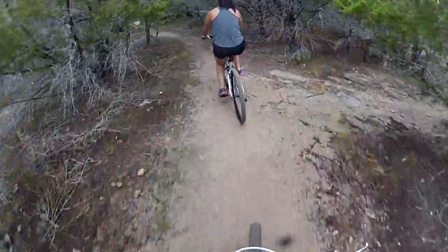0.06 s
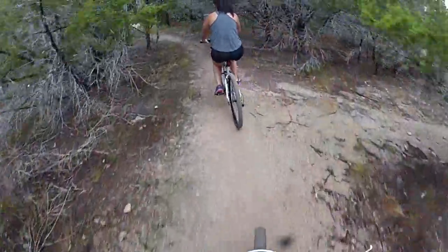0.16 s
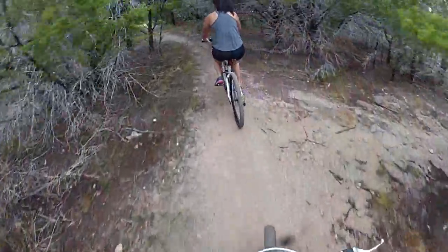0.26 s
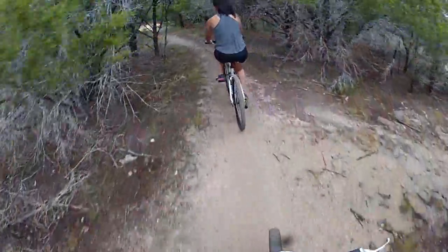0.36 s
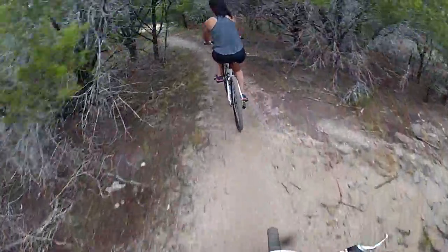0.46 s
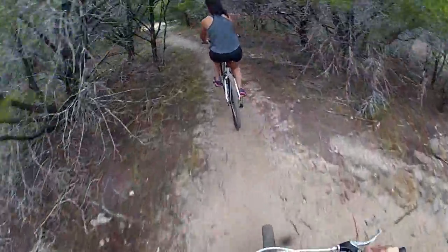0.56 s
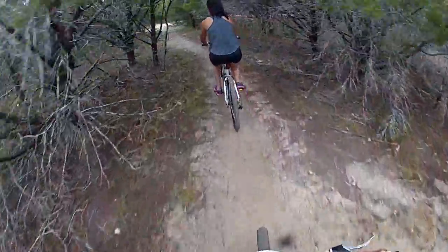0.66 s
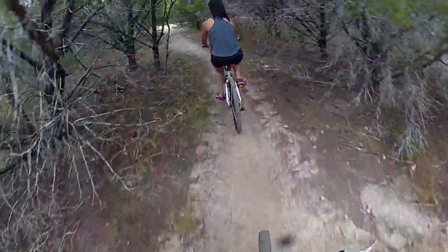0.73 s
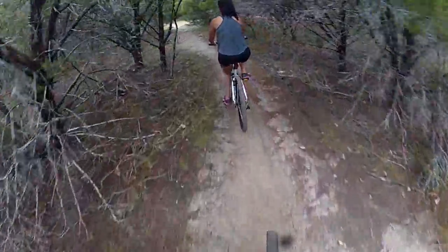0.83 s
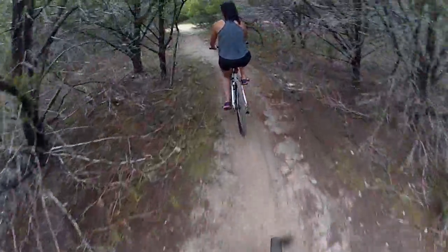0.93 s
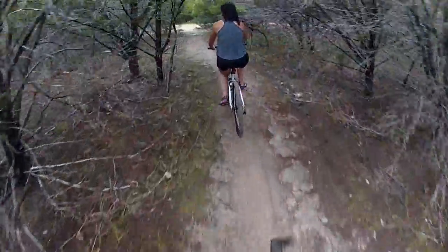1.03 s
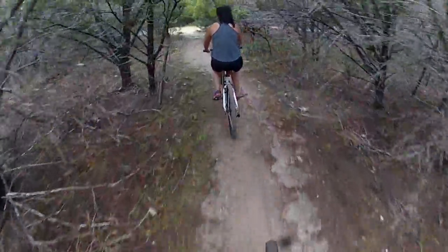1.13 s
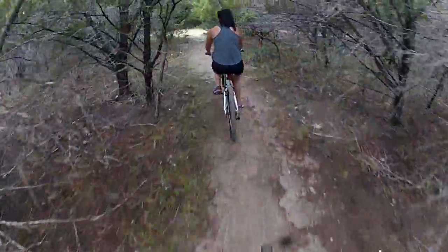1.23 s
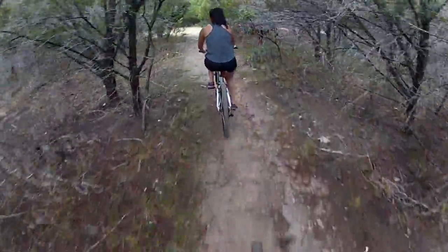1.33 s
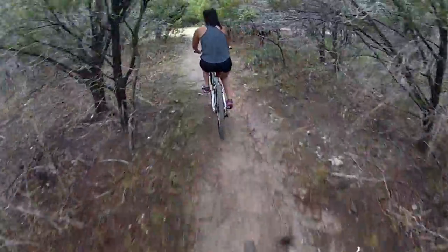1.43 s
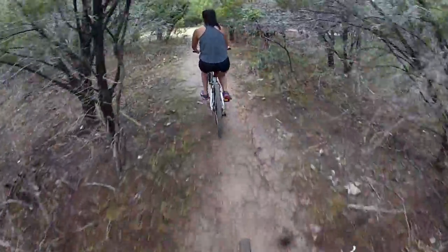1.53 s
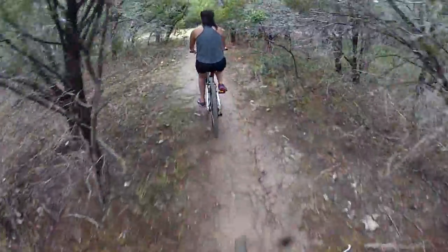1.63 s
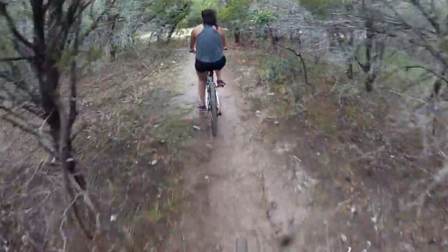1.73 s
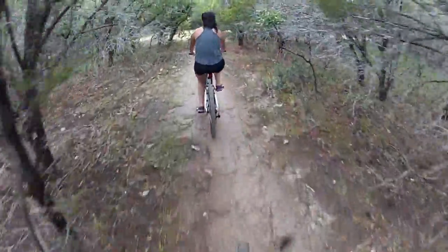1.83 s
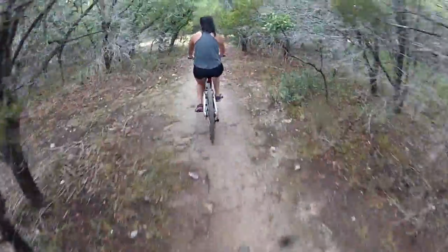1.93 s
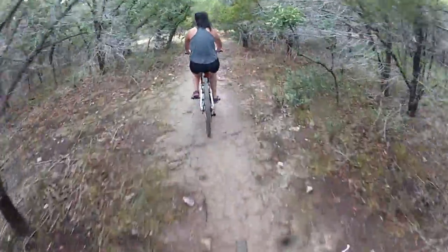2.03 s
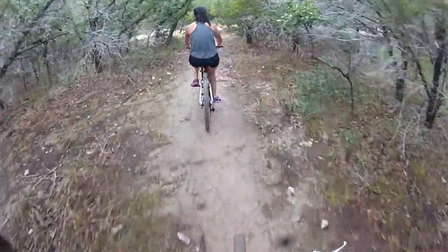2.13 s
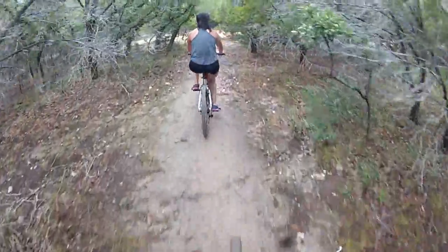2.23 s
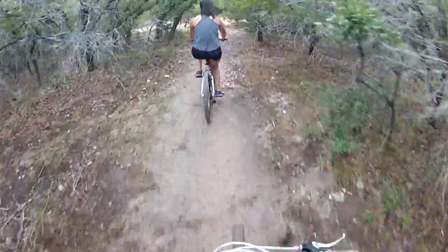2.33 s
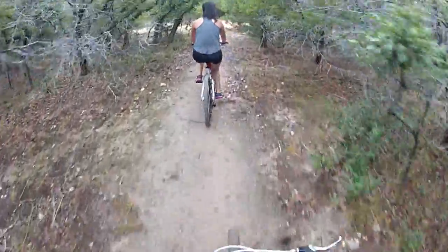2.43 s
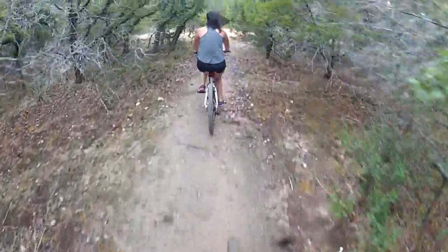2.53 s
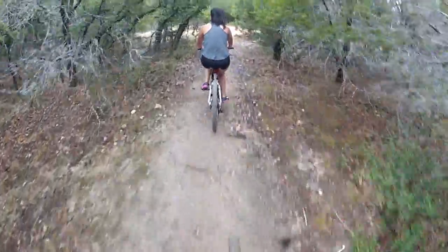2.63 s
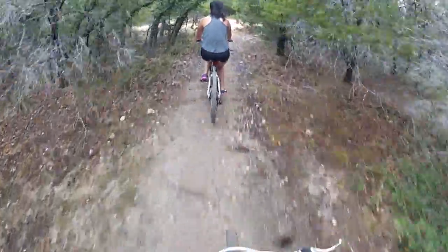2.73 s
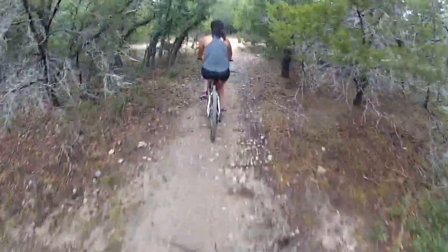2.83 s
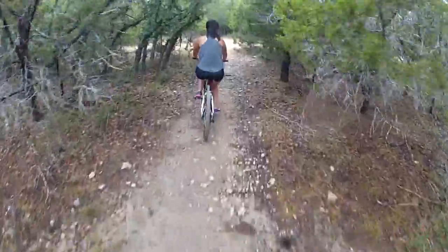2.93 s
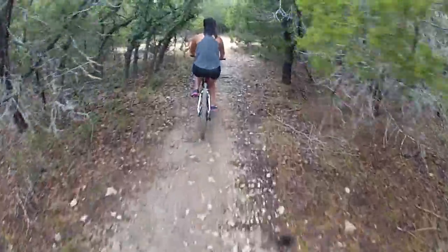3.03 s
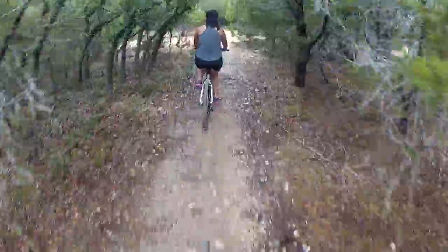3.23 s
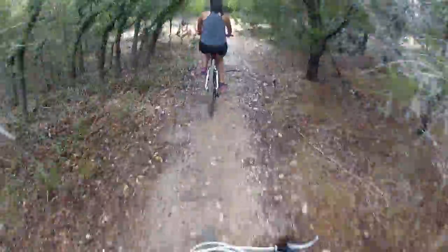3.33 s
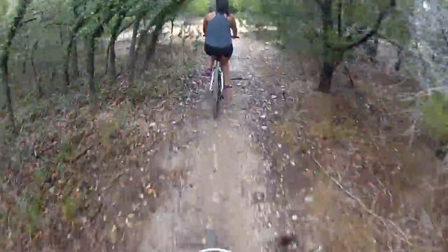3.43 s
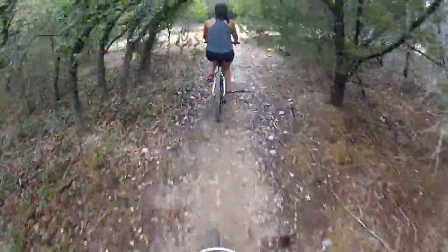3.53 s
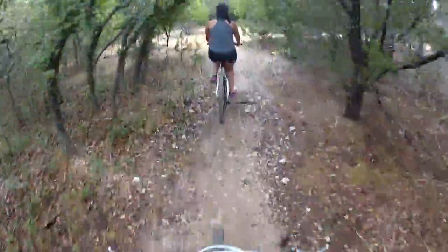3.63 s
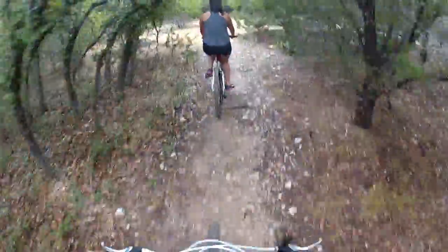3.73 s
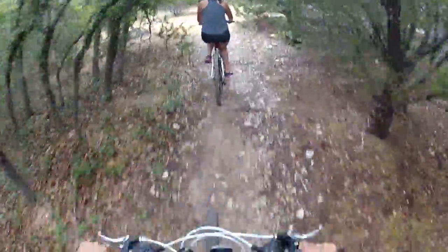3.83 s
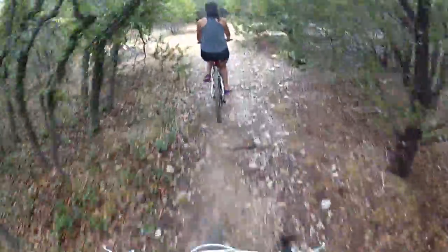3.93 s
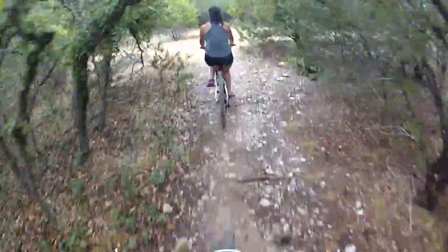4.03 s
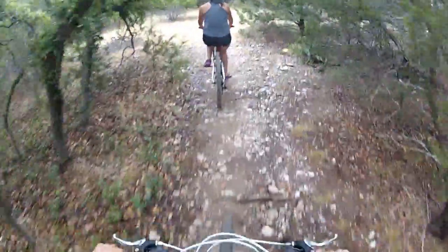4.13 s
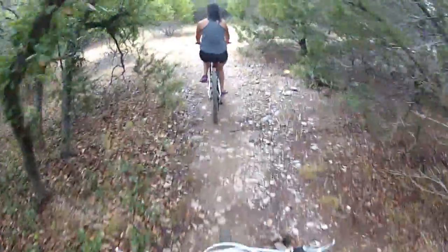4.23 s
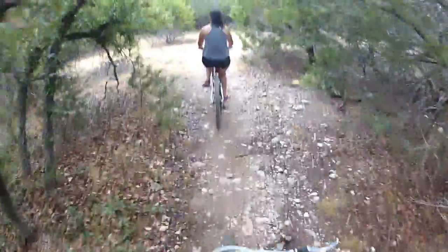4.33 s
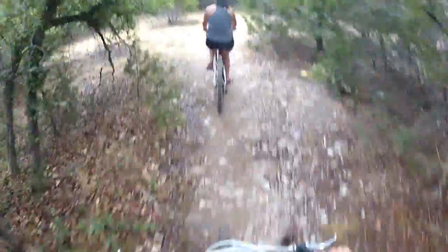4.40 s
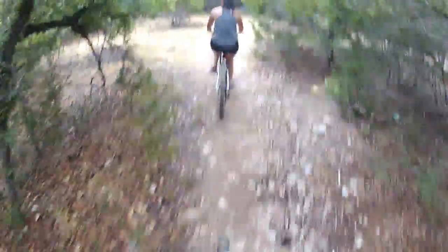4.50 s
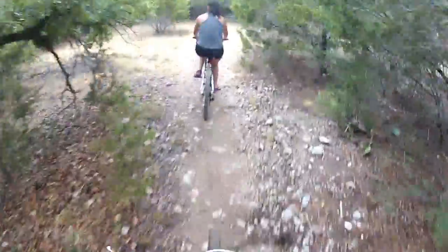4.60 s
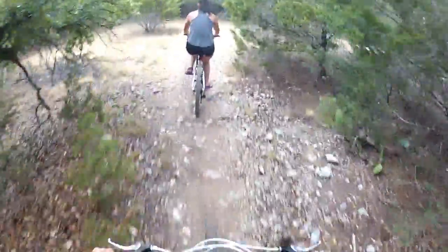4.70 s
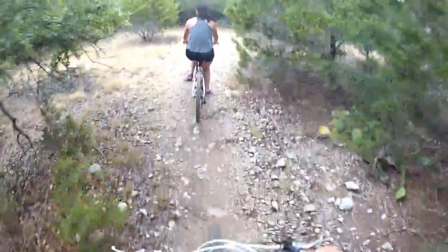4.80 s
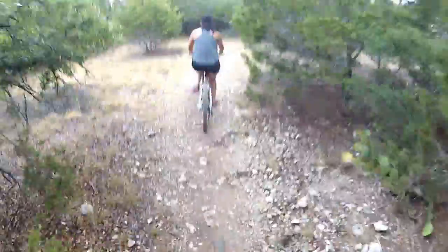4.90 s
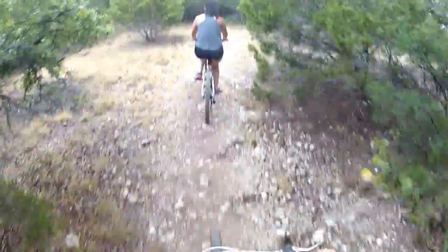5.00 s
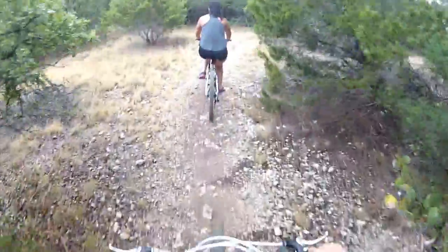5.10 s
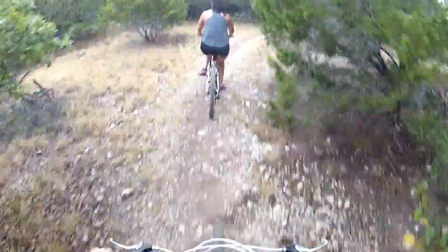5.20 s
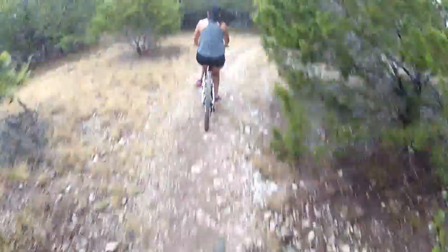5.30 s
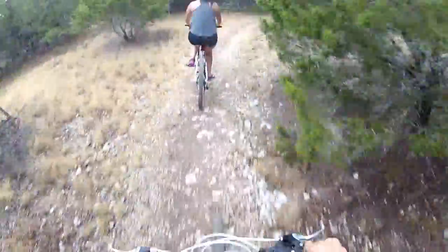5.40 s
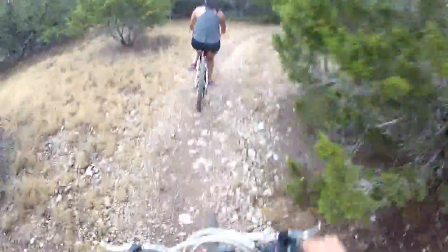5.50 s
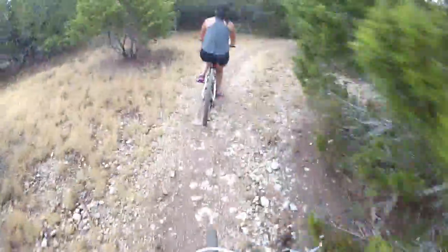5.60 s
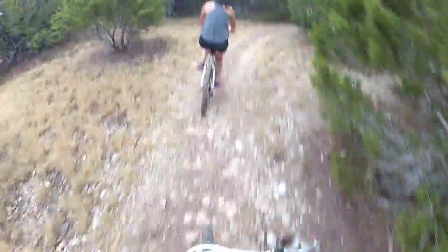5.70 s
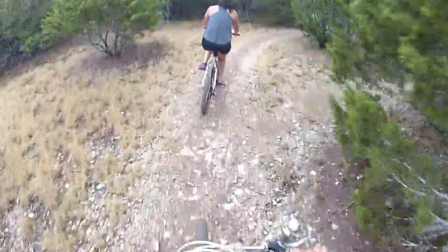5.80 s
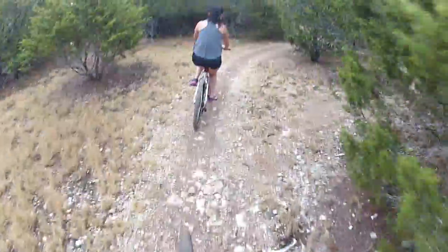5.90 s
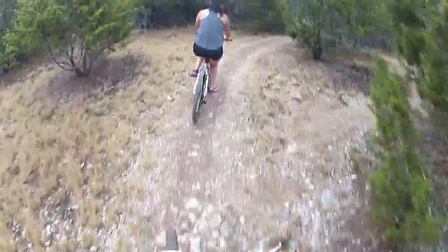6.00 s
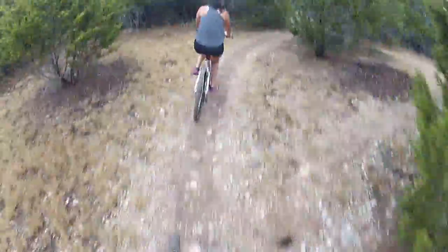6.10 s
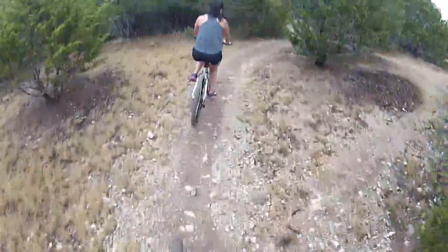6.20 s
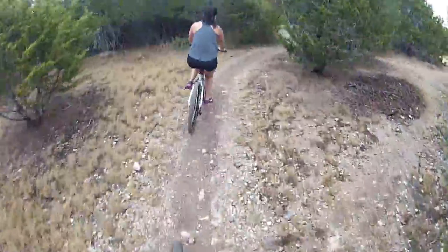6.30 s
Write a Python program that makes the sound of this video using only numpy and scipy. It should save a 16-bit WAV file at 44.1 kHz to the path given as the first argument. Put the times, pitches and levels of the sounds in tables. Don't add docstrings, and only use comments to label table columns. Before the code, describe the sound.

A bike-mounted microphone inside a closed case picks up dull low rumble, soft rocking and faint electronic hiss and buzz on smooth dirt. A few rattles start after two seconds, then hard clacks and hollow shakes come in irregular clusters as the trail turns rocky. Low jolts push the microphone, and short thin squeaks slip between knocks. The sound is close, dry, lo-fi and gritty on top.

```python
import sys
import numpy as np
from scipy import signal
from scipy.fft import rfft, irfft
from scipy.io import wavfile
from scipy.ndimage import uniform_filter1d

SR = 44100
rng = np.random.default_rng(int(sys.argv[2]) if len(sys.argv) > 2 else 0)


def ratio(d):
    e = np.asarray(d, float) / 20
    return 10 ** e


def generate_wav(signal):
    frames = np.transpose(np.atleast_2d(signal))
    scaled = np.clip(frames, -1, 1) * 32767
    pcm = np.round(scaled).astype(np.int16)
    wavfile.write(sys.argv[1], SR, pcm)


N = 280035


def rms_one(x):
    return x / np.sqrt(np.mean(x ** 2) + 1e-20)


def filtered(x, order, hz, kind="low"):
    return signal.sosfilt(signal.butter(order, hz, kind, fs=SR, output="sos"), x)


def around(s, reach_s):
    span = slice(max(int((s - reach_s) * SR), 0), min(int((s + reach_s) * SR), N))
    return span, np.arange(span.start, span.stop) / SR - s


def drift(per_s):
    r = np.exp(-2 * np.pi * per_s / SR)
    noise = rng.standard_normal(N + SR)
    return rms_one(signal.lfilter([1], [1, -2 * r, r * r], noise)[SR:])


def coloured(spectrum):
    hz, db = np.transpose(spectrum)
    bins_hz = np.arange(N // 2 + 1) * SR / N + 1
    gain = ratio(np.interp(np.log(bins_hz), np.log(hz), db, left=-80, right=-80))
    return rms_one(irfft(rfft(rng.standard_normal(N)) * gain, N))


def resonate(x, modes):
    out = 0
    for k, (hz, width_hz, db) in enumerate(modes):
        r = np.exp(-np.pi * width_hz / SR)
        poles = [1, -2 * r * np.cos(2 * np.pi * hz / SR), r * r]
        ringing = signal.lfilter([1 - r * r, 0, r * r - 1], poles, x + 1e-18)
        out = out + (-1) ** k * ratio(db) * ringing
    return out


def contacts(per_s, spread_db):
    sizes = ratio(spread_db * np.minimum(rng.exponential(1, N), 3.5))
    signs = rng.choice([-1, 1], N)
    return rms_one(sizes * signs * (rng.random(N) < per_s / SR))


# time_s, roughness_db
TRAIL = [(0.0, -8.5), (0.6, -14), (1.2, -9), (1.9, -5), (2.4, -3.5), (2.9, 2.5), (3.3, -2), (3.55, 4),
         (3.95, 6), (4.25, 0), (4.6, 5.5), (5.0, 3.5), (5.25, 7), (5.55, 9.5), (5.75, 10.5), (6.05, 10),
         (6.35, 12.5)]


def roughness():
    return np.interp(np.arange(N) / SR, *np.transpose(TRAIL))


# centre_s, sway_db, half_length_s
HUMPS = [(0.16, -52.5, 0.26), (.4, -54.5, 0.074), (.6, -52.5, 0.071), (0.844, -49.5, .03),
         (1.004, -45, 0.044), (1.16, -38.5, .06), (1.404, -45.5, 0.076), (1.652, -41, 0.017),
         (1.783, -48.5, 0.047), (2.024, -47, 0.052), (2.194, -53, 0.052), (2.503, -42, 0.065),
         (2.943, -47, 0.059), (3.322, -40.5, 0.091), (3.673, -37, 0.021), (4.136, -42, .04),
         (4.406, -34, 0.02), (3.435, -39, .03), (4.74, -39, 0.039), (4.89, -46, 0.062), (5.14, -47, 0.036),
         (5.57, -48, 0.071), (6.034, -36, 0.019), (6.173, -42, 0.046), (6.268, -30.5, 0.029)]


def sway_level(rough_db):
    level = ratio(SWAY_DB + 0.55 * rough_db)
    late_s, stirred_db, stirred_s = 0.01, -4, 0.033
    stirred = [(s + late_s, db + stirred_db, stirred_s) for s, db, *rest in JOLTS]
    for s, db, half_s in list(HUMPS) + stirred:
        span, t = around(s, 0.3)
        level[span] += ratio(db) * np.exp(-(t / half_s) ** 2)
    return level


SWAY_DB = -48


def shaking(level):
    sway = filtered(rng.standard_normal(N + SR), 3, [20, 45], "band")[SR:]
    power = uniform_filter1d(sway ** 2, size=4000)
    out = rms_one(sway / np.sqrt(power + 0.15 * np.mean(sway ** 2)))
    for s, *rest in JOLTS:
        span, t = around(s, 0.1)
        out[span] *= 1 - 0.69 * np.exp(-(t / 0.028) ** 2)
    return ratio(-7.0) * level * out


# pitch_hz, level_db (per Hz)
WIND = [(40, -1), (65, 3.5), (95, -0.5), (150, -1.5), (260, -3), (450, -13), (800, -18.5), (1300, -31)]


def wind(rough_db, rocking):
    level_db = -65 + 0.089 * rough_db + 2.0 * drift(25)
    stirred = (rocking / ratio(SWAY_DB)) ** 0.23
    return ratio(level_db) * stirred * coloured(WIND)


# centre_s, level_db, half_length_s, body_db (hollow body relative)
RATTLES = [(0.014, -65.5, 0.096, -2), (2.476, -55, 0.015, -2), (2.759, -56, 0.0097, -10),
           (2.879, -63, 0.011, 5), (2.927, -58.5, 0.015, -1.5), (3.74, -53.5, .011, 3.5),
           (3.851, -55, 0.02, 4.5), (3.968, -55, 0.014, -2), (4.153, -58.5, 0.0092, 5),
           (4.248, -62, 0.017, -1), (4.357, -57.5, 0.039, 0.5), (4.429, -52, 0.016, 5.5),
           (4.538, -59, 0.015, 6), (4.631, -50.5, 0.01, -9), (4.681, -49.5, 0.029, 0.5),
           (4.753, -60, 0.015, 7), (4.817, -56, 0.0078, -8), (4.929, -56.5, 0.017, -7),
           (5.023, -48.5, 0.018, 0.5), (5.093, -51.5, 0.02, -0.5), (5.415, -58, 0.012, -8),
           (5.487, -63, 0.02, -5), (5.532, -57, .017, 5.5), (5.619, -52.5, 0.027, 1.5),
           (5.685, -47.5, 0.015, 5.5), (5.81, -54.5, 0.03, 1), (5.98, -63, 0.014, -8),
           (6.024, -47.5, 0.013, -5), (6.176, -51, 0.013, 3), (6.242, -55, 0.008, 0)]


def bursts():
    after = [(s + 0.0058, db, 0.0095, 0.014, -1) for s, *rest, db in KNOCKS]
    again = [(s + 0.024, db - 9, 0.0068, 0.0068, 0.5) for s, *rest, db in KNOCKS]
    loose = [(s, db, 0.95 * half_s, 0.92 * half_s, body_db) for s, db, half_s, body_db in RATTLES]
    return after + again + loose


def airborne():
    hush = np.ones(N)
    for s, *rest in KNOCKS:
        span, t = around(s, 0.05)
        hush[span] *= 1 - 0.4 * (t < 0) * np.exp(-(t / 0.012) ** 2)
    return hush


# pitch_hz, width_hz, level_db
CASE = [(890, 93, -8), (1181, 138, -2), (1544, 370, -11), (1807, 120, 0.5), (2130, 240, -6.5),
        (2417, 170, -6), (2865, 130, -10), (3050, 93, -16), (3427, 183, -12.5), (3700, 118, -9),
        (5200, 370, -26.5)]
# pitch_hz, width_hz, level_db
HOLLOW = [(112, 51, -0.5), (200, 36, -5), (268, 23, 0.5), (544, 270, -14)]


def rattle(rough_db):
    running_db = -73.5 + 1.16 * rough_db
    walls = ratio(running_db - 2.0 + 1.15 * drift(33))
    body = np.zeros(N)
    for s, db, rise_s, fall_s, body_db in bursts():
        span, t = around(s, 0.2)
        away = np.where(t < 0, -t / max(rise_s, 0.002), t / max(fall_s, 0.002))
        swell = ratio(-6.0 * np.minimum(away, 8) ** 2.24)
        walls[span] += ratio(db - 5.0) * swell
        body[span] += ratio(db + body_db - 1) * swell

    grains = contacts(per_s=2000.0, spread_db=2.5)
    hush = airborne()
    wall_sound = np.zeros(N)
    for k, mode in enumerate(CASE):
        fed = grains * ratio(2.5 * drift(74.0)) * (-1) ** k
        wall_sound += resonate(walls * hush * fed, [mode])
    wall_sound /= np.std(resonate(grains, CASE)) * ratio(3.0)

    pushes = contacts(per_s=3500.0, spread_db=6.5)
    body_sound = resonate(body * hush * pushes, HOLLOW) * ratio(13.0)
    return filtered(wall_sound, 2, 720, "high") + filtered(body_sound, 2, 900)


# pitch_hz, width_hz, level_db
ROLLING = [(1090, 110, 1), (2120, 270, -1), (2413, 78, -1), (2877, 170, -0.5), (3300, 550, -6.5)]


def rolling():
    hum = np.zeros(N)
    for mode in ROLLING:
        grains = contacts(per_s=1500.0, spread_db=5.0)
        hum += ratio(2.0 * drift(8.1)) * resonate(grains, [mode])
    return ratio(-76) * rms_one(hum)


# pitch_hz, level_db (per Hz)
HISS = [(400, 7), (800, -6.5), (1150, 1), (1600, -4.5), (2200, -2.5), (3000, -9), (4200, -9), (5300, -8),
        (5800, -13.5), (6300, -20)]
# multiple (of the frame rate), level_db
BUZZ = [(2, -73.5), (3, -74.5), (4, -78.5), (5, -80.5), (6, -80.5), (7, -85.5), (8, -85), (10, -90),
        (12, -101.5)]


def electronics():
    frame_hz = 59.94
    t = np.arange(N) / SR
    buzz = np.zeros(N)
    for multiple, db in BUZZ:
        turns = int(round(multiple)) * frame_hz * t + rng.random()
        buzz += ratio(db + 1.5) * np.sin(2 * np.pi * turns)
    return ratio(-74.5 + 0.17 * drift(11.0)) * coloured(HISS) + buzz


# start_s, length_s, low_hz, high_hz, level_db
TICKS = [(0.328, 0.043, 4800, 6400, -84), (.463, .003, 2500, 6400, -75), (0.477, 0.0043, 2900, 3500, -71),
         (0.497, 0.01, 1900, 3700, -72), (.508, 0.0055, 2200, 4500, -71), (0.854, 0.0096, 950, 1350, -73),
         (1.613, 0.0069, 950, 2300, -69), (1.631, 0.027, 900, 3220, -76), (1.79, 0.0029, 900, 3300, -81),
         (1.903, 0.047, 5200, 6500, -82), (1.943, 0.0058, 2500, 5500, -76), (2.114, 0.03, 3000, 5800, -82),
         (2.286, 0.0083, 2200, 6000, -73.5)]


def ticks():
    out = np.zeros(N)
    for s, length_s, low_hz, high_hz, db in TICKS:
        band = rms_one(filtered(rng.standard_normal(4000), 2, [low_hz, high_hz], "band"))
        shape = np.sin(np.linspace(0, np.pi, min(int(length_s * SR), 3000)))
        at = int(s * SR)
        out[at:at + len(shape)] += ratio(db + 5.5) * shape * band[-len(shape):]
    return out


# start_s, peak_db, hollow_db (body relative), rattle_db
KNOCKS = [(0.858, -54, -22, -76), (2.514, -50, -14, -58.5), (2.783, -51.5, -9, -57.5),
          (2.911, -57, -23, -58.5), (3.478, -54, -7, -54), (3.523, -39, -19, -48.5),
          (3.55, -38.5, -21, -71), (3.771, -36.5, -10, -48), (3.878, -40.5, -12, -52),
          (4.001, -47.5, -6, -54.5), (4.102, -61, -20, -59), (4.178, -42.5, -16, -55),
          (4.46, -36.5, -9, -53.5), (4.525, -54, -7, -52.5), (4.568, -34.5, -6, -41.5),
          (4.676, -35, -13, -49.5), (4.73, -50.5, 1, -56), (4.779, -45, -9.5, -66),
          (4.846, -46.5, -20, -67), (4.885, -44, -24, -52), (4.962, -57, -2, -49.5),
          (5.0, -34.5, -4.5, -47.5), (5.128, -42.5, 0.5, -44.5), (5.297, -55, -5, -58),
          (5.346, -39, -4, -47), (5.46, -41, -12.5, -50), (5.719, -32, -2.5, -40.5),
          (5.856, -35.5, -2, -42), (6.144, -54.5, 6, -61), (6.271, -33.5, -4, -41.5)]
# pitch_hz, width_hz, level_db
THUD = [(142, 110, -6), (265, 59.4, 0), (548, 320, -25)]


def knocks():
    s, db, hollow_db, rattle_db = np.transpose(KNOCKS)
    timing = rng.standard_normal((3, len(s)))
    out = np.zeros(N)
    for k, mode in enumerate(CASE):
        clicks = np.zeros(N)
        for bounce in range(3):
            late_s = 0.0006 + bounce * 0.0057 * (1 + 0.33 * timing[bounce])
            at = np.minimum(((s + late_s) * SR).astype(int), N - 1)
            strength_db = 2 * rng.standard_normal(len(s))
            clicks[at] -= ratio(db + 21.5 - 5.6 * bounce + strength_db)
        out += (-1) ** k * resonate(clicks, [mode])
    soft = filtered(out, 3, 3900)
    push = np.zeros(N)
    push[((s + 0.0014) * SR).astype(int)] = ratio(db + hollow_db + 45.0)
    return soft + filtered(resonate(push, THUD), 2, 1100)


# centre_s, depth_db, swing_hz, rebound_db (relative)
JOLTS = [(1.179, -42.5, 26.4, -4), (2.793, -35.5, 33, 2), (2.872, -40, 29.3, 7), (3.019, -38, 36.5, 1),
         (3.31, -39.5, 42.4, 5), (3.484, -35, 25.5, 3.5), (3.534, -32.5, 42, 5), (3.732, -33.5, 35.5, 4.5),
         (3.781, -25.5, 50.7, -0.5), (3.866, -33, 28.6, -3), (4.019, -39, 49.6, 6), (4.075, -35, 33, 2.5),
         (4.172, -34, 45.6, -6), (4.424, -34, 30, 1.5), (4.468, -23, 51.3, -1), (4.525, -35, 39.5, 9.5),
         (4.585, -26, 59.3, 1), (4.681, -23, 55, -1), (4.804, -32, 47.6, -1.5), (4.971, -28.5, 37.8, 4),
         (5.021, -22, 53.7, 1), (5.37, -34, 47.7, 6), (5.463, -27.5, 50.3, 1), (5.611, -34, 41.8, 6.5),
         (5.679, -26.5, 45.4, 4.5), (5.738, -17.5, 54.5, -3), (5.816, -30, 31.4, 4.5),
         (5.882, -29, 45, 0.5), (6.003, -35, 28.6, -4), (6.289, -23, 60.4, 3)]


def jolts():
    out = np.zeros(N)
    for s, db, hz, rebound_db in JOLTS:
        span, t = around(s, 0.2)
        turns = t * hz
        slowed = np.where(t > 0, 1.796 * np.log1p(np.abs(turns) / 1.91), turns)
        fade = np.exp(-(slowed / np.where(t > 0, 0.85, 0.42)) ** 2)
        rebound = ratio(rebound_db * np.clip(slowed * 4 - 1, 0, 1))
        out[span] -= ratio(db) * fade * rebound * np.cos(2 * np.pi * slowed)
    return out


# start_s, length_s, start_hz, end_hz, level_db
SQUEAKS = [
    (2.254, 0.013, 5080, 5100, -65),
    (3.527, .017, 5200, 5050, -62),
    (4.231, 0.042, 5300, 4900, -59.5),
    (5.06, .009, 5400, 5320, -65),
    (5.067, 0.02, 5400, 5200, -60),
    (5.366, 0.037, 5200, 5070, -66),
    (5.919, 0.022, 5300, 5100, -58.5),
    (6.308, .018, 5330, 5120, -60),
]


def squeaks():
    out = np.zeros(N)
    flutter = ratio(4.5 * drift(150.0))
    for s, length_s, start_hz, end_hz, db in SQUEAKS:
        part = np.linspace(0, 1, int(length_s * SR))
        hz = end_hz + (start_hz - end_hz) * (1 - part) ** 1.6
        whistle = np.sin(2 * np.pi * np.cumsum(hz) / SR)
        at = int(s * SR)
        out[at:at + len(part)] += ratio(db - 7.5) * np.sin(np.pi * part) ** 0.98 * whistle
    return out * flutter


def scene():
    rough_db = roughness()
    rocking = sway_level(rough_db)
    low = shaking(rocking) + wind(rough_db, rocking) + jolts()
    case = rattle(rough_db) + knocks() + squeaks()
    return (low + case + rolling() + electronics() + ticks())[None]


def low_pass(x):
    return signal.sosfilt(signal.butter(12, 16360, fs=SR, output="sos"), x)


def record(dry):
    coarse = signal.resample_poly(dry, 40, 147, axis=1)
    held = signal.resample_poly(np.repeat(coarse, 4, axis=1), 147, 160, axis=1)[:, :N]
    cut = signal.sosfilt(signal.ellip(10, 0.2, 60, 15250, fs=SR, output="sos"), held)
    return low_pass(cut)


dry = scene()
out = record(dry)
generate_wav(out)
```